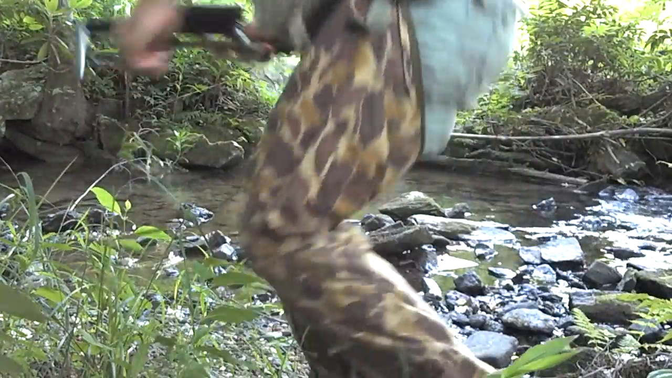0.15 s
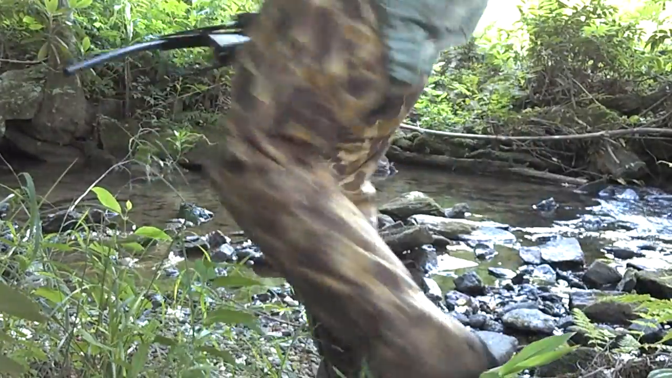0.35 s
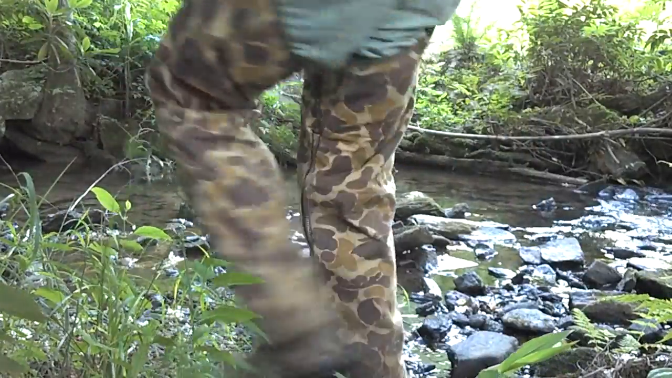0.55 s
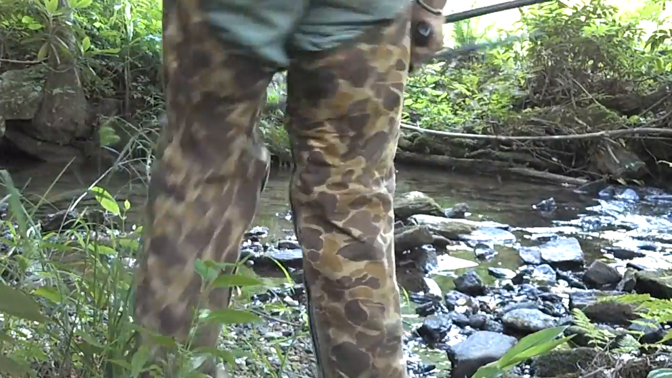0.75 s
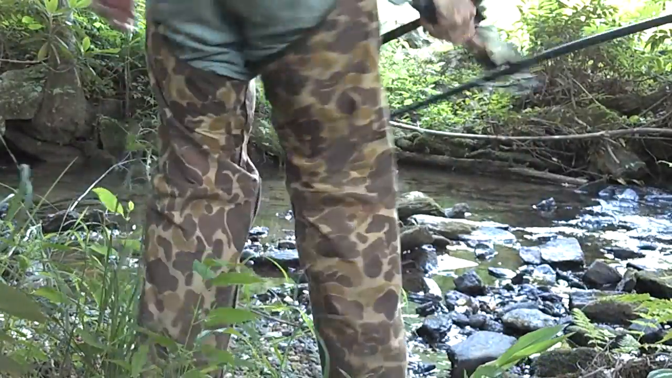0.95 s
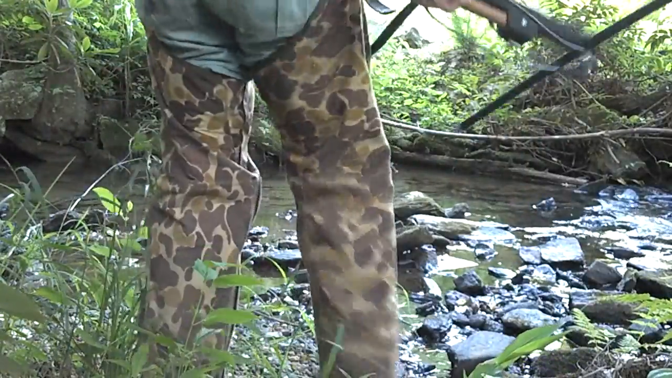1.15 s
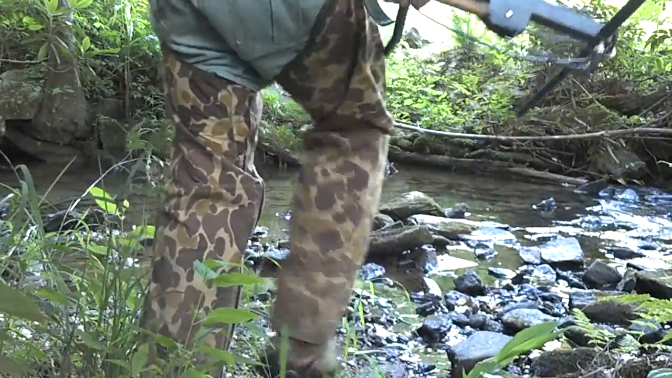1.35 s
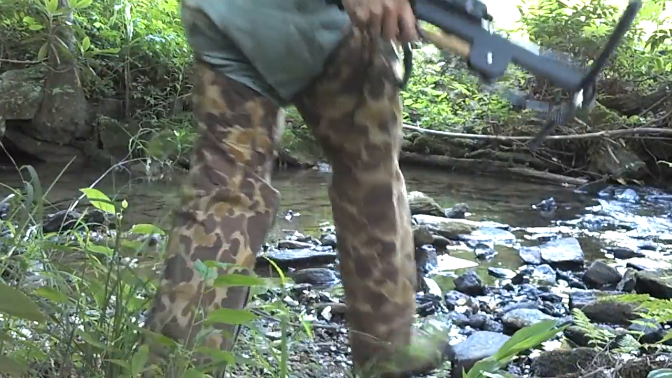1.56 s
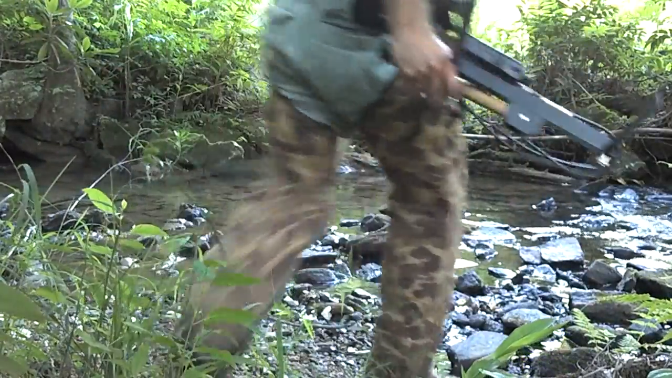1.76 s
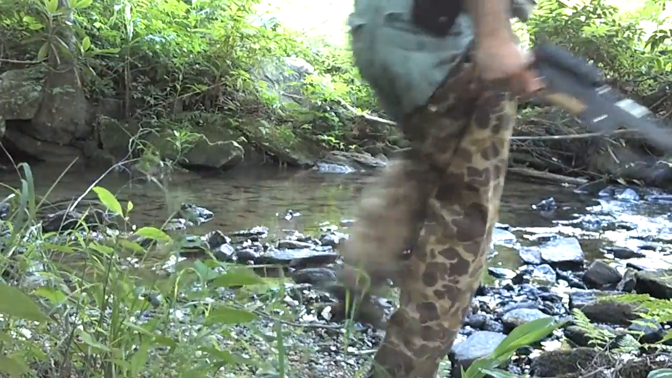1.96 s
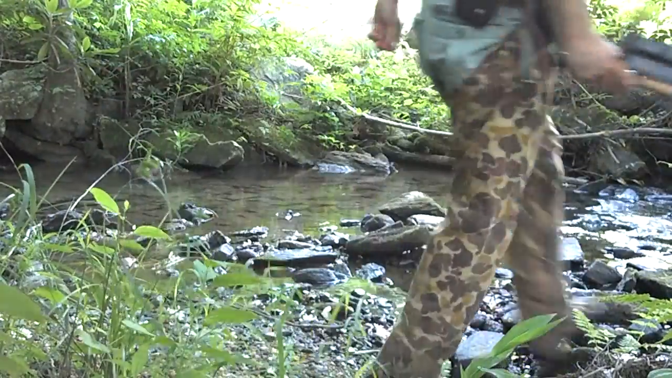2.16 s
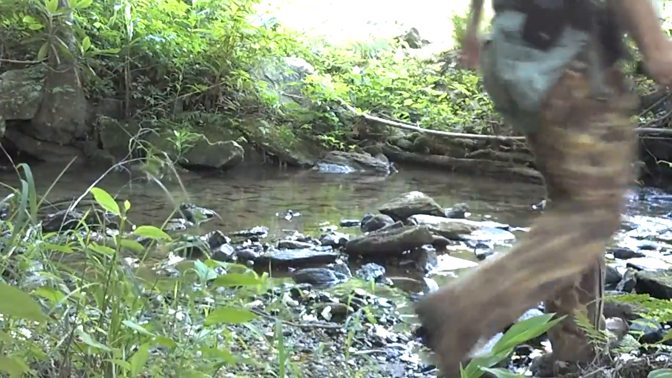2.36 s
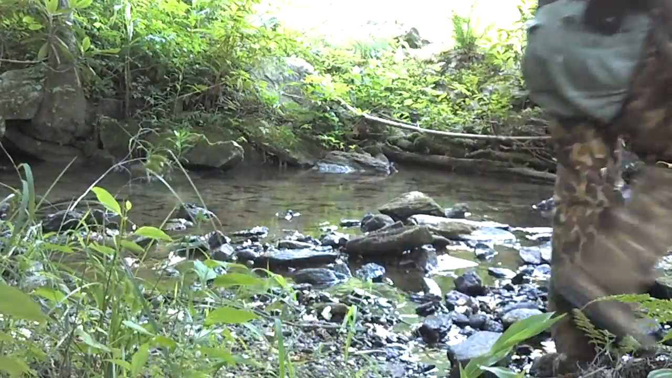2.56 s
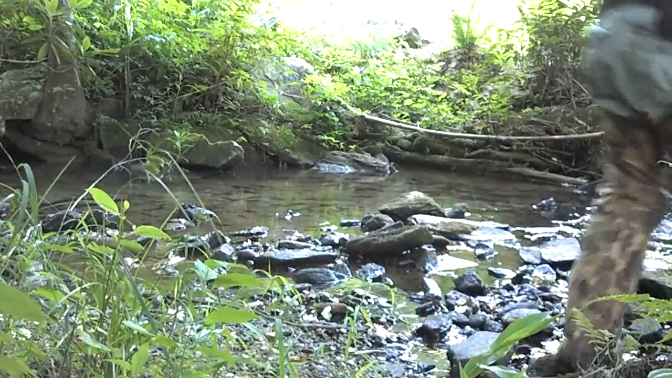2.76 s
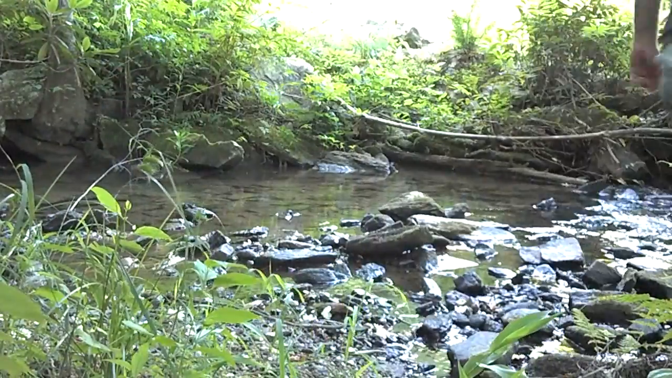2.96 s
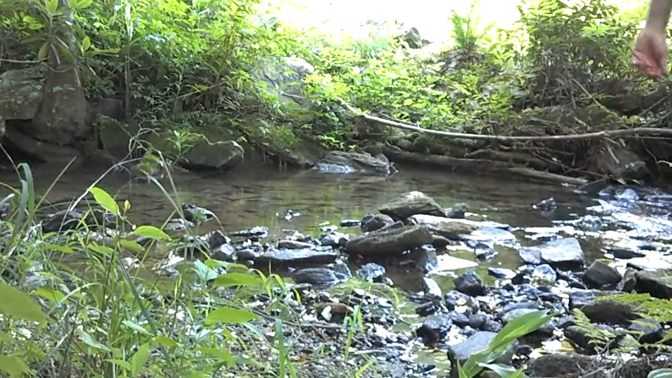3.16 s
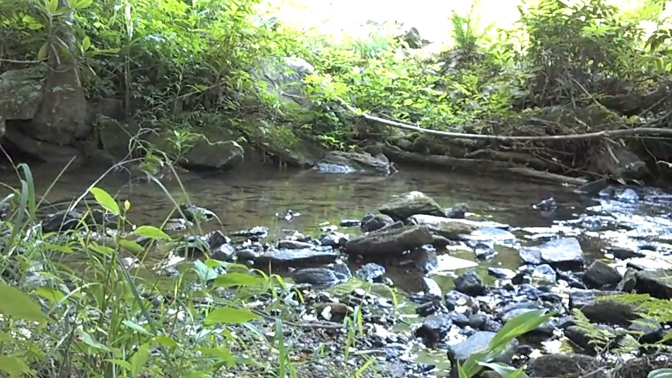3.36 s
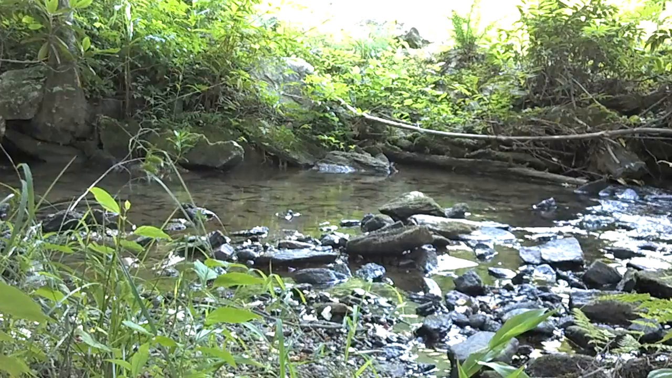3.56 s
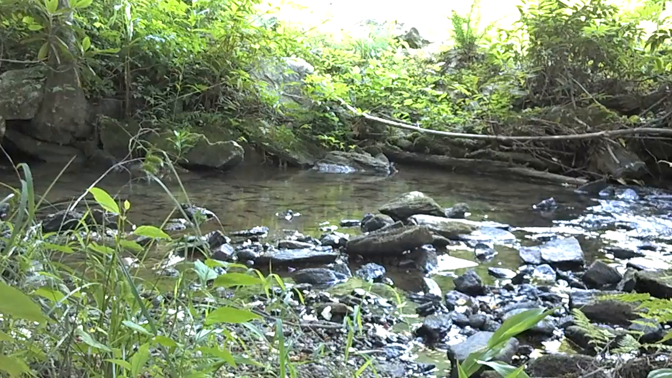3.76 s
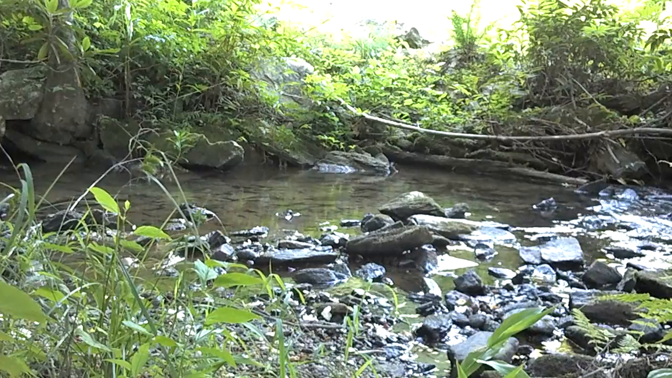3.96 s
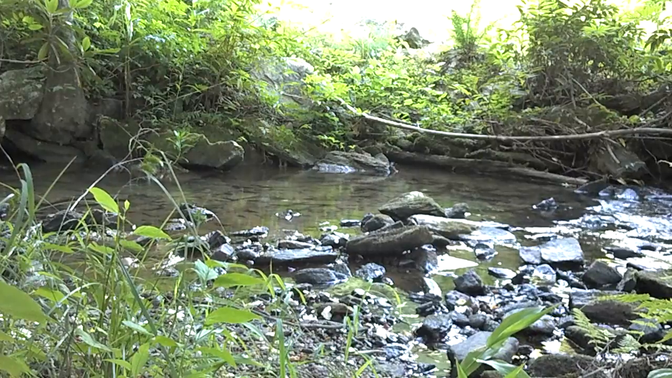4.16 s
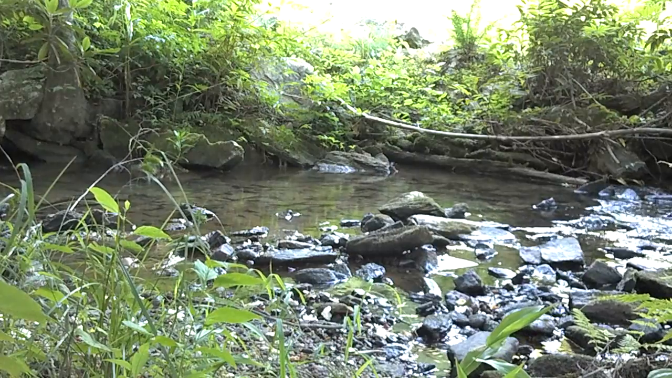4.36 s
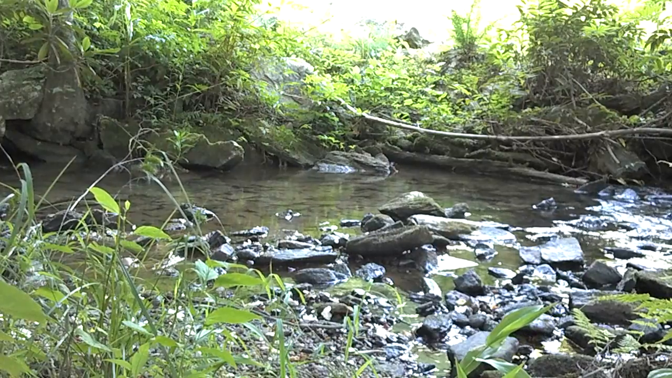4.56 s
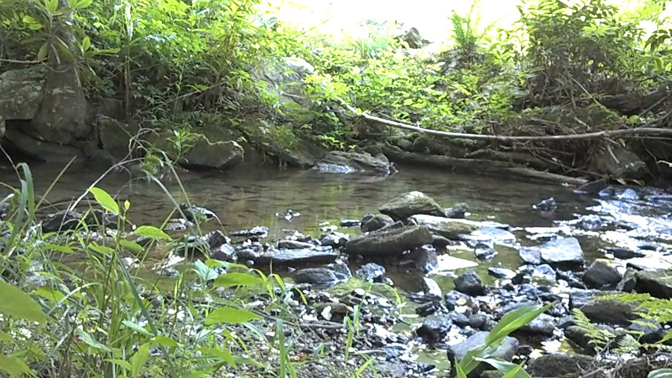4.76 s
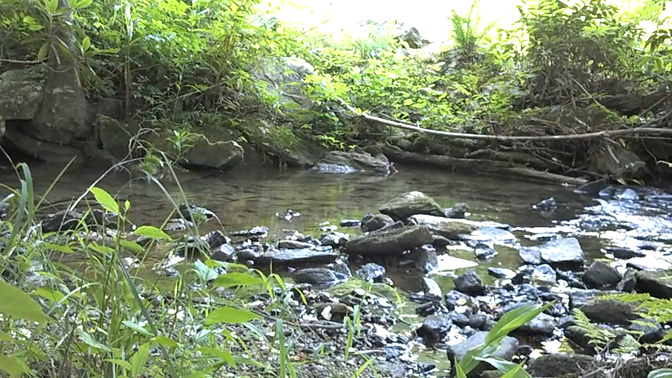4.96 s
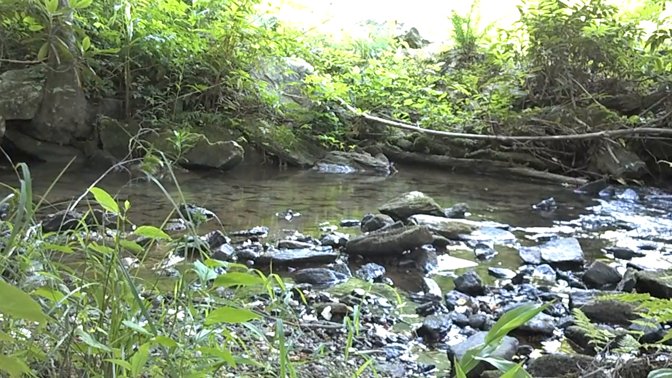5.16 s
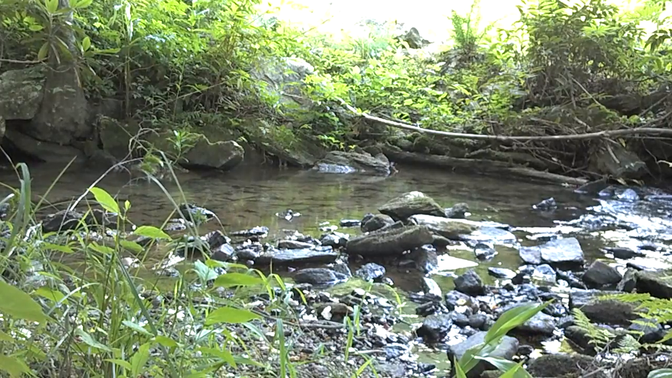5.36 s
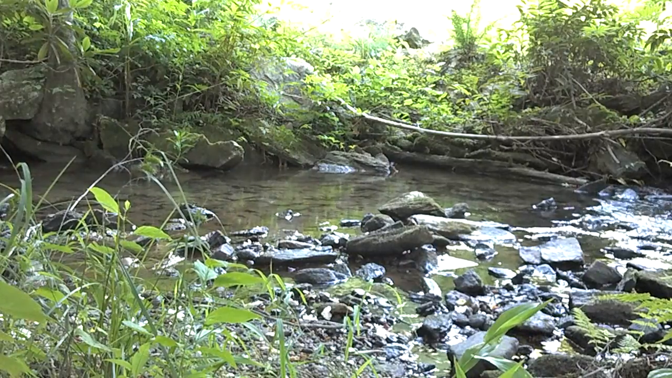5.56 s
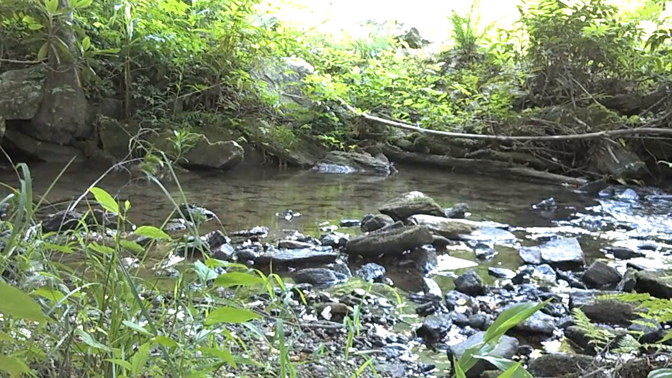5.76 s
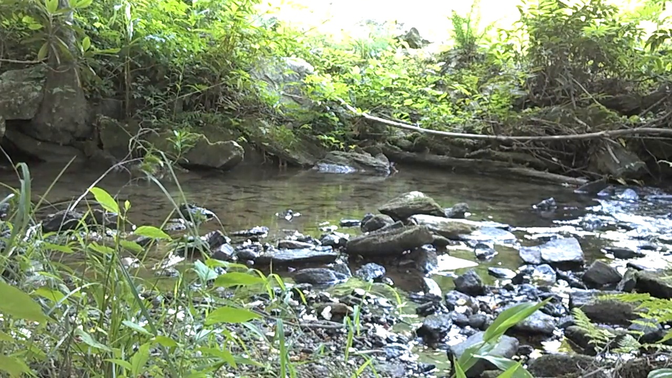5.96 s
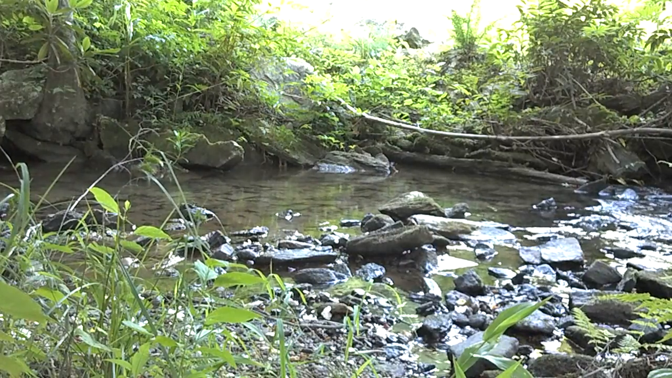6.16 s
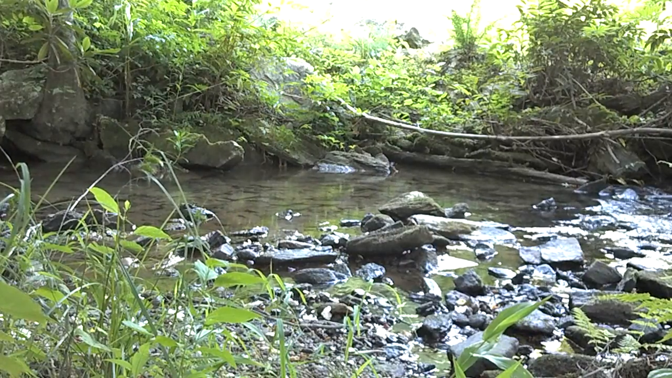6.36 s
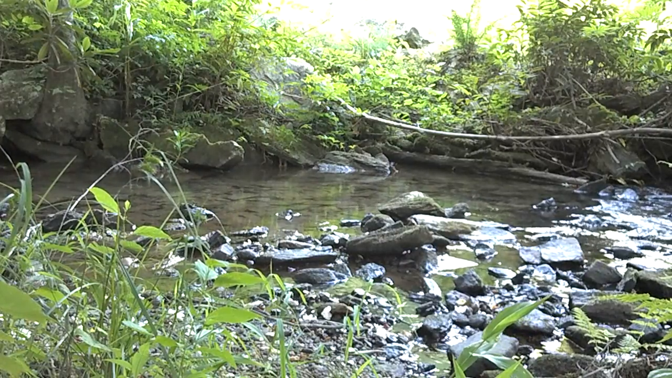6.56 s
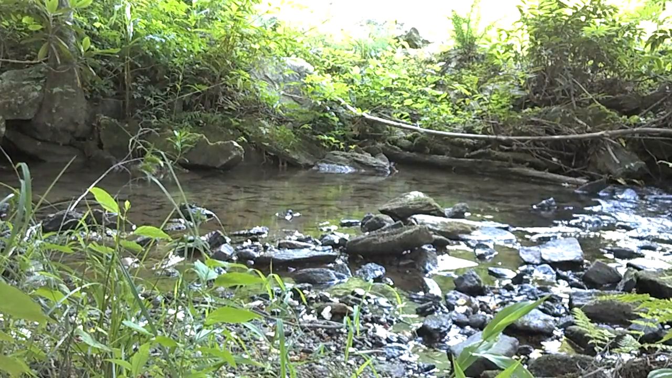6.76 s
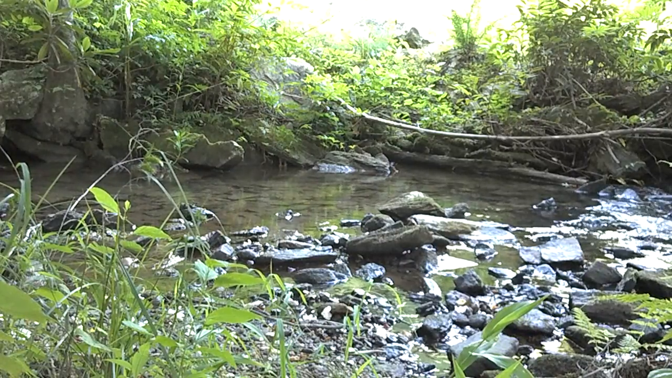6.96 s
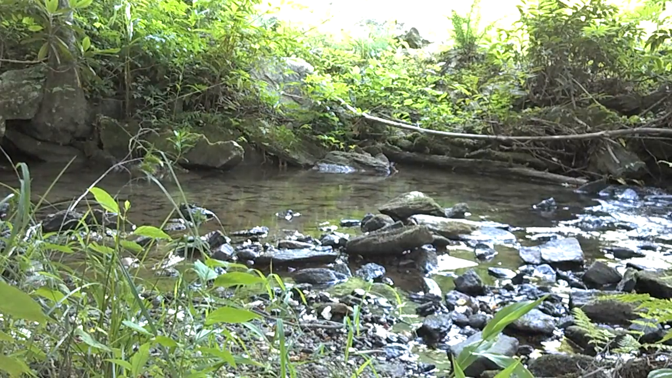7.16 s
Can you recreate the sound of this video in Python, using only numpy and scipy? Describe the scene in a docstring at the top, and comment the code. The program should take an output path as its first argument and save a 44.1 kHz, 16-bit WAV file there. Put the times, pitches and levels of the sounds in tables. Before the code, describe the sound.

A shallow rocky creek runs throughout, a steady soft rush with fine spray, low gurgling and little rising bubble plinks, over a faint lumpy breeze. Close by, someone in waders moves on the gravel bank. At 0.1 s a low sole thud and cloth rustle; around 0.7 s a gravel scrape and swish; at 1.0 s a dull step, then a crisp tick at 1.2. Shuffling grows from 1.8 s, stones knock at 2.2, and the loudest crunch comes near 2.4-2.6 s, grinding, rustling and clacking. A firm step lands at 2.95 s, softer hollow thumps at 3.4 and 3.7, brushing and a step around 4.0, small stone clicks at 4.6. A sharp, dry stone clack snaps at 5.3 s. Afterwards lighter scuffs at 5.6-5.9, 6.75 and 7.0 s punctuate the continuing water. The walker drifts across the stereo image; the sound is open and dry.

```python
"""Creek and gravel walker

A shallow creek rushes and gurgles: patchy filtered noise, and short rings of rising pitch for bubbles.
Someone in waders crosses the gravel bank: soles, gravel, cloth and leaves are grainy noise, swelling with
each event; stones knock as brief tone pulses, and short coloured noise bursts tick.
A light breeze adds lumpy low noise. Cross-subtracting two delayed ports combs the stereo image."""
import sys
import numpy as np
from scipy import signal
from scipy.fft import rfft, irfft, next_fast_len
from scipy.io import wavfile
from scipy.ndimage import uniform_filter1d

SR = 44100
rng = np.random.default_rng(int(sys.argv[2]) if len(sys.argv) > 2 else 0)


def master(y):
    """Save y as 16-bit WAV."""
    cut = np.clip(np.atleast_2d(y).T, -1, 1)
    pcm = np.round(cut * 32767)  # scale
    wavfile.write(sys.argv[1], SR, pcm.astype(np.int16))


N = 321930


def gain_of(db):
    """Amplitude ratio of a level in dB."""
    return 10 ** (np.asarray(db) / 20)


def evened(x):
    """Scales to unit rms."""
    return x / np.sqrt(np.mean(x ** 2) + 1e-20)


def read(points, hz, axis=1):
    """Reads one column of a table on a log-frequency axis."""
    table = np.transpose(points)
    return np.interp(np.log(hz + 1), np.log(table[0] + 1), table[axis])


def add(mix, start_s, sound):
    """Mixes a sound in at start_s, cut at the end."""
    part = mix[round(start_s * SR):][:len(sound)]
    part += sound[:len(part)]


# microphone ports: [f/Hz, likeness (-1 to 1), first minus second level/dB]
PORT_PAIR = [(90, 1, 1), (294, 0.96, -1.5), (635, 0.98, -2), (1100, 0.32, 5), (1800, .05, 2),
             (2700, -.15, 3), (3800, 0, 4.5), (6800, 0.02, 9), (10060, -0.12, 14.5), (11800, -0.85, -14),
             (14500, 0.29, -11)]


def port_tilt(hz):
    """Half the level difference of the ports, as a gain: first times it, second divided by it."""
    return gain_of(read(PORT_PAIR, hz, axis=2) / 2)


def hiss(tone, patchy_db):
    """Noise from many directions at both ports, with drifting patches in time and pitch."""
    frames, hz = N // 128 + 5, np.fft.rfftfreq(512, 1 / SR)
    a, b, c, d, patches = rng.standard_normal((frames, 257, 5)).T
    patches = uniform_filter1d(patches, 6, 0)
    patches = evened(uniform_filter1d(patches, 14, 1))
    same = np.clip(read(PORT_PAIR, hz), -1, 1)[:, None]
    first, other = a + 1j * b, c + 1j * d
    second = same * first + np.sqrt(1 - same ** 2) * other
    tilt = port_tilt(hz)[:, None]
    z = np.array([first * tilt, second / tilt])
    z *= gain_of(read(tone, hz)[:, None] + patchy_db * patches)
    return evened(signal.istft(z, nperseg=512, noverlap=384)[1][:, :N])


def random_hits(per_s, spread_db):
    """Sparse impulses at random times, of uneven amplitude."""
    size = gain_of(spread_db * np.minimum(rng.exponential(1, N), 4))
    return size * (rng.random(N) < per_s / SR)


def grainy(per_s, spread_db, ring_s, bed):
    """Envelope of random slips, each starting sharply and dying, over a steady bed."""
    power = random_hits(per_s, 2 * spread_db)
    power = signal.lfilter([1], [1, -np.exp(-1 / (ring_s * SR))], power)
    return evened(np.sqrt(bed + power / power.mean()))


def from_side(x, lag):
    """A point source reaches the second port lag samples after the first."""
    size = next_fast_len(N)
    hz = np.fft.rfftfreq(size, 1 / SR)
    tilt, z = port_tilt(hz), rfft(x, size)
    delay = np.exp(-2j * np.pi * hz * lag / SR)
    return irfft([z * tilt, z / tilt * delay], size)[:, :N]


def ring(hz, cycles, glide):
    """Decaying sine with a soft start; a positive glide raises the pitch."""
    turns = np.arange(2000) / SR * hz
    tone = np.sin(2 * np.pi * turns * (1 + glide * turns))
    return tone * np.exp(-turns / cycles) * (1 - np.exp(-turns / 1.87))


def blips(per_s, low_hz, high_hz, cycles, glide, spread_db, lags):
    """Random short rings of many pitches and sizes, from a few directions."""
    out, count = np.zeros((len(lags), N)), 24
    hits = random_hits(per_s, spread_db)
    kind = rng.integers(0, count, N)
    for k, hz in enumerate(np.geomspace(low_hz, high_hz, count)):
        out[k % len(lags)] += signal.oaconvolve(hits * (kind == k), ring(hz, cycles, glide))[:N]
    return evened(sum(from_side(x, lag) for x, lag in zip(out, lags)))


# steady creek rush spectrum: [f/Hz, relative level/dB per Hz]
RUSH_TONE = [(30, -18), (55, -33), (90, -28), (130, 9), (250, -9.5), (500, 5), (800, -3.5), (1200, -7.5),
             (1900, -21), (2400, -58), (3200, -10), (4000, -10.5), (5000, -12.5), (6200, -16),
             (8000, -17.5), (10000, -26), (12000, -37), (14500, -22)]


def creek():
    """A patchy rush with fine spray in it, and bubbles that ring with rising pitch."""
    rush = hiss(RUSH_TONE, patchy_db=1.0) * grainy(per_s=150, spread_db=3.0, ring_s=0.0079, bed=0.39)
    gurgle = blips(per_s=320, low_hz=335.3, high_hz=1897, cycles=4.3, glide=0.0068,
                   spread_db=3.5, lags=(-3.5, 1.5, 6.5))
    # one pocket between the stones keeps releasing bubbles of a like size
    pocket = blips(per_s=30, low_hz=490, high_hz=620.5, cycles=6.6, glide=0.002,
                   spread_db=2.0, lags=(1.5,))
    return gain_of(-56) * rush + gain_of(-64.5) * pocket + gain_of(-58.5) * gurgle


# breeze spectrum at the ports: [f/Hz, relative level/dB per Hz]
BREEZE_SPECTRUM = [(30, 11), (60, -4), (130, 5), (300, -3.5), (700, -7), (1500, -60)]


def breeze():
    """Lumpy low noise, unrelated at the two ports."""
    hz = np.fft.rfftfreq(N, 1 / SR)
    noise = irfft(rfft(rng.standard_normal((2, N))) * gain_of(read(BREEZE_SPECTRUM, hz)), N)
    lumps = evened(irfft(rfft(rng.standard_normal((2, N))) * np.exp(-hz / 5.2), N))
    return gain_of(-56.5) * evened(noise) * gain_of(4.8 * lumps)


# walker's bearing, crossing in front of the ports: [t/s, second-port lag/samples]
WALKER_BEARING = [(0, 6), (1.1, 5), (2.2, 4.5), (3.0, -0.5), (3.7, -2), (4.6, -5.5), (5.3, -5), (5.6, -4),
                  (7.0, -6.5)]


def from_walker(x):
    """A sound whose lag at the second port follows the walker's bearing."""
    n, (s, lag) = np.arange(N), np.transpose(WALKER_BEARING)
    first, second = from_side(x, lag=0)
    return np.array([first, np.interp(n - np.interp(n / SR, s, lag), n, second)])


# walker's nearness, scaling the shuffle between events: [t/s, level/dB]
WALKER_NEARNESS = [(0, 3.5), (1.2, -0.5), (2.2, 4.5), (2.8, -1), (3.6, -2.5), (4.8, 1.5), (6.002, 0),
                   (7.3, 0)]
SHUFFLE_DB, SHUFFLE_HZ = 1, 28  # waver depth (rms) and rate scale


def effort(events, axis, bed_db):
    """A wavering shuffle that follows nearness, plus one rise and fall for each event."""
    t, (s, near_db) = np.arange(0, N, 64) / SR, np.transpose(WALKER_NEARNESS)
    waver_hz = np.fft.rfftfreq(len(t), t[1])
    waver = irfft(rfft(rng.standard_normal(len(t))) * np.exp(-waver_hz / SHUFFLE_HZ), len(t))
    power = gain_of(2 * (bed_db + np.interp(t, s, near_db) + SHUFFLE_DB * evened(waver)))
    for row in events:
        peak_s, rise_s, fall_s = row[:3]
        away = np.where(t < peak_s, (peak_s - t) / rise_s, (t - peak_s) / fall_s)
        power = power + gain_of(2 * (row[axis] - 20 * away))
    return np.interp(np.arange(N) / SR, t, np.sqrt(power))


# soles rolling on the bank: [f/Hz, relative level/dB]
SOLE_SPECTRUM = [(70, -55), (130, -9), (200, 6.5), (350, 3), (550, -2.5), (900, -14.5), (2000, -54)]


def tread():
    """Low grainy noise, near enough that both ports hear it alike."""
    soles = from_walker(hiss(SOLE_SPECTRUM, patchy_db=3.3)[0])
    return soles * grainy(per_s=130, spread_db=3.0, ring_s=0.0062, bed=0.41)


# gravel grinding under the soles: [f/Hz, relative level/dB]
GRAVEL_SPECTRUM = [(300, 5), (600, 3), (900, 13), (1300, -4.5), (2000, 0.5), (3000, -24), (6000, -20)]


def grind():
    """Grainy scraping, with short rings as small stones nudge each other under the load."""
    scrape = hiss(GRAVEL_SPECTRUM, patchy_db=0.7) * grainy(per_s=200, spread_db=5.0, ring_s=0.009, bed=0.56)
    nudges = blips(per_s=500, low_hz=533, high_hz=2320, cycles=2.27, glide=0,
                   spread_db=-1.0, lags=(-2.5, 5.5))
    return gain_of(-8.0) * scrape + gain_of(-9.0) * nudges


# soles loading the bank: [peak t/s, 20 dB rise/s, 20 dB fall/s, tread gain/dB, grind gain/dB]
SOLE_LOADS = [(0.1, 0.029, 0.11, -37.5, -61), (0.67, 0.7, 0.17, -43, -50), (1.025, 0.03, 0.18, -41.5, -56),
              (1.14, 0.15, 0.089, -65, -44.5), (1.35, 0.18, 0.26, -43.5, -44), (1.66, 0.13, 0.1, -49, -64),
              (1.84, 0.076, .1, -48, -44), (1.93, 0.18, 0.21, -40, -34.5),
              (2.19, 0.077, 0.14, -38.5, -40.5), (2.32, .1, 0.069, -60, -45), (2.44, 0.031, .06, -42, -32),
              (2.48, 0.063, 0.11, -34, -30.5), (2.61, 0.26, 0.14, -38, -58), (2.9, 0.11, .05, -42.5, -53),
              (2.965, 0.064, 0.17, -33.5, -45), (3.42, 0.083, 0.29, -42, -46), (3.7, 0.13, 0.19, -53, -67),
              (3.96, 0.056, 0.18, -57, -47), (4.03, 0.26, 0.11, -42.5, -53), (4.1, 0.035, 0.06, -42, -50),
              (4.22, 0.055, .06, -60, -53), (4.578, 0.035, 0.057, -39, -52),
              (4.615, 0.039, 0.041, -55, -40), (4.72, 0.1, 0.3, -72, -45),
              (5.29, 0.11, 0.083, -37.5, -40.5), (5.44, 0.047, .06, -60, -49),
              (5.62, 0.091, 0.058, -45, -48), (5.77, 0.076, 0.21, -56, -46.5),
              (5.9, 0.066, 0.016, -45.5, -50), (6.18, 0.089, 0.029, -51, -46.5),
              (6.64, 0.4, 0.18, -59, -46), (6.8, 0.32, 0.24, -52.5, -49.5), (7.04, 0.2, 0.22, -46, -71)]


def footfalls():
    """Tread and grind swell as each sole loads the bank."""
    return (effort(SOLE_LOADS, axis=3, bed_db=-60.5) * tread()
            + effort(SOLE_LOADS, axis=4, bed_db=-54.5) * grind())


# waders and leaves brushing: [f/Hz, relative level/dB]
RUSTLE_SPECTRUM = [(1000, 16), (2200, 11), (3200, 6.5), (4000, 7.5), (5000, 6.5), (6200, 5.5), (8000, 4),
                   (10500, -11.5), (13000, -2.5), (16000, -34)]


def rustle():
    """Grainy noise of waders and leaves; dry leaves and grit crackle as short rings."""
    brushing = hiss(RUSTLE_SPECTRUM, patchy_db=2.88) * grainy(per_s=150, spread_db=1.0, ring_s=0.004, bed=1.0)
    crackle = blips(per_s=250, low_hz=2300, high_hz=7740, cycles=7.8, glide=0,
                    spread_db=1.0, lags=(-3.5, 5.5, 9.5))
    return brushing + gain_of(-10.5) * crackle


# thin high swish of the cloth: [f/Hz, relative level/dB]
SWISH_SPECTRUM = [(6000, -8.5), (9500, -5.5), (12000, -6), (14500, -1.5), (16000, -2.5)]


def swish():
    """High cloth noise in sparse, slower grains."""
    return hiss(SWISH_SPECTRUM, patchy_db=2.6) * grainy(per_s=54, spread_db=4.0, ring_s=0.017, bed=0.99)


# cloth and leaves brushed: [peak t/s, 20 dB rise/s, 20 dB fall/s, rustle gain/dB, swish gain/dB]
BRUSH_EVENTS = [(0.02, 0.11, 0.04, -53, -52), (0.45, 0.028, .04, -65, -54), (0.67, 0.057, 0.1, -50.5, -46),
                (0.91, 0.56, 0.071, -59, -53), (1.06, 0.31, 0.3, -53, -54.5),
                (1.22, 0.032, 0.016, -49.5, -54), (1.38, 0.54, 0.32, -53, -51.5),
                (1.83, 0.099, 0.1, -45.5, -52), (1.93, 0.094, 0.18, -43, -50),
                (2.09, .06, 0.067, -60, -44.5), (2.21, 0.12, 0.12, -52.5, -61),
                (2.45, 0.065, 0.33, -40.5, -52), (2.54, 0.18, 0.049, -42, -67), (2.68, 0.17, .15, -74, -67),
                (2.95, 0.065, 0.28, -46.5, -48), (3.31, 0.014, 0.063, -47.5, -53),
                (3.49, 0.18, 0.082, -50.5, -55.5), (3.7, 0.069, 0.071, -53, -50),
                (3.96, 0.052, 0.11, -44.5, -47), (4.15, 0.098, 0.013, -49, -57),
                (4.25, 0.12, 0.2, -55.5, -56), (4.63, 0.07, 0.16, -48, -66), (5.02, .04, 0.055, -65, -59),
                (5.31, 0.058, 0.067, -42.5, -72), (5.65, .12, 0.38, -58, -61), (5.81, .06, 0.045, -58, -59),
                (6.53, 0.088, 0.025, -63, -57), (6.77, 0.052, 0.086, -50, -65),
                (7.04, .04, 0.074, -76, -67)]


def brushes():
    """Rustle and swish swell as cloth and leaves are brushed in passing."""
    return (effort(BRUSH_EVENTS, axis=3, bed_db=-57) * rustle()
            + effort(BRUSH_EVENTS, axis=4, bed_db=-61.5) * swish())


# short noise bursts, ticks and one longer burst near 2.7 kHz: [t/s, level/dB, centre f/Hz, t60/s]
TICK_BURSTS = [(0.0148, -32.5, 7030, 0.046), (0.106, -41, 4760, 0.022), (0.394, -37.5, 3740, .022),
               (1.2027, -34, 6000, .008), (1.2144, -22, 9800, 0.0047), (1.2212, -30, 14500, .012),
               (1.7424, -43, 4080, .02), (2.1683, -30, 6800, .016), (2.176, -31.5, 3740, 0.017),
               (2.249, -39.5, 4140, .03), (2.3126, -36, 6500, 0.031), (2.4229, -31, 7150, 0.022),
               (2.4234, -34, 12500, .01), (2.4456, -30, 6800, 0.012), (2.447, -36, 4200, .015),
               (2.4654, -30, 4290, .018), (2.479, -32, 6800, .015), (2.495, -42, 7000, 0.012),
               (2.5426, -23, 4500, 0.019), (2.9397, -46, 4070, 0.024), (2.952, -36, 4200, 0.032),
               (3.2725, -45, 4310, .02), (3.3147, -33, 3900, 0.014), (3.4775, -35, 7000, .02),
               (3.614, -37.5, 4680, 0.022), (3.7, -36, 7110, .02), (3.9448, -29.5, 6500, 0.037),
               (4.032, -34, 4560, .018), (4.127, -33.5, 2650, 0.07), (4.1425, -35, 6500, .01),
               (4.2507, -37, 3880, 0.025), (4.602, -39, 3800, .01), (4.631, -34.5, 4000, 0.029),
               (4.665, -41, 6500, .012), (4.7145, -43, 4500, .012), (4.8404, -38, 4100, .02),
               (5.069, -38, 7100, 0.027), (5.295, -19.5, 2980, 0.0095), (5.2972, -38, 7040, 0.022),
               (5.2965, -44, 11500, 0.0066), (5.305, -38, 4540, .03), (5.312, -35, 3930, .03),
               (5.2959, -32.5, 3830, 0.058), (5.47, -45, 3780, .015), (5.7992, -39, 10500, 0.0054),
               (5.8004, -32, 14500, 0.011), (5.8065, -37, 14500, .01), (6.321, -46, 3820, .02),
               (6.3544, -40, 7570, .018), (6.616, -40, 4180, .02), (6.5246, -46, 7350, .018),
               (6.756, -36.5, 4260, 0.029), (7.028, -41, 7300, .012), (7.034, -41, 13500, .02),
               (7.041, -44, 14500, 0.04)]
TICK_OCTAVES, TICK_LAG_SAMPLES = 0.31, 3.35
TICK_T60_S, TICK_NARROWING = 0.022, 0.17  # longer bursts are narrower in colour


def ticks():
    """Short noise bursts, each with a colour around its centre."""
    out, t = np.zeros((2, N)), np.arange(2048) / SR
    hz = np.fft.rfftfreq(2048, 1 / SR)
    tilt = port_tilt(hz)
    delay = np.exp(-2j * np.pi * hz * TICK_LAG_SAMPLES / SR)
    lead = 32  # samples of room before the onset
    for (s, db, centre_hz, t60), noise in zip(TICK_BURSTS, rng.standard_normal((len(TICK_BURSTS), 2048))):
        width = TICK_OCTAVES * (TICK_T60_S / t60) ** TICK_NARROWING
        burst = irfft(rfft(noise) * np.exp(-(np.log2((hz + 1) / centre_hz) / width) ** 2))
        burst = burst / abs(burst[:200]).max()
        envelope = gain_of(db - 60 * t / t60) * (1 - np.exp(-t / 0.00029))
        z = rfft(np.roll(envelope * burst, lead))
        add(out[0], s - lead / SR, irfft(z * tilt))
        add(out[1], s - lead / SR, irfft(z / tilt * delay))
    return out


# soles landing, stones rocking, knocking, once squeaking: [middle t/s, level/dB, f/Hz, length/cycles]
BLOWS = [(0.0945, -33, 806, 0.76), (0.0975, -39, 710, 5.1), (0.1296, -34.5, 1140, 1.3),
         (0.621, -40, 211, 0.45), (0.6368, -37, 744, 1.2), (0.6622, -32, 470, 3.4), (0.6795, -33, 486, 4.3),
         (0.833, -39, 895, 1), (0.9925, -37, 444, 1), (1.0195, -38, 794, 0.55), (1.0215, -24.5, 240, 1.15),
         (1.378, -30, 386, 1.5), (1.4339, -31, 360, 1.04), (1.66, -40, 576, 2.2), (1.682, -33, 111, 0.66),
         (1.7644, -37, 790, 1), (1.784, -33.5, 600, 0.72), (1.789, -36, 131, 1.2), (1.8418, -30, 318, 0.66),
         (1.9411, -25, 605, 0.72), (1.953, -33, 910, 0.59), (2.035, -33, 206, 0.81),
         (2.169, -28.5, 1160, 0.79), (2.178, -31.5, 795, 2), (2.1995, -26, 477, 1), (2.2052, -22, 427, 2.4),
         (2.2172, -23.5, 330, 0.64), (2.2497, -30.5, 1550, 1.1), (2.313, -23, 1030, 1.1),
         (2.3152, -28, 1210, 1.1), (2.4224, -20.5, 157, 0.45), (2.4239, -19.5, 960, 0.77),
         (2.4395, -33, 813, 14), (2.4445, -34, 960, 2.8), (2.447, -31.5, 1480, 3.1),
         (2.4697, -26, 940, 6.4), (2.48, -25, 1180, 1.4), (2.4876, -33, 746, 3.5), (2.4962, -33, 1410, .9),
         (2.502, -30, 1160, 0.91), (2.5432, -29, 1300, 1.9), (2.5604, -23.5, 400, 1.3),
         (2.5804, -24.5, 172, 0.57), (2.6074, -36, 335, 4.1), (2.9405, -33, 541, 0.75),
         (2.9712, -33.5, 484, 6.4), (2.9807, -22, 550, 0.79), (3.4154, -23.5, 238, 0.67),
         (3.6857, -23.5, 247, 0.5), (3.692, -22.5, 340, 0.71), (3.694, -21.5, 173, 1.4),
         (3.6993, -33, 337, 2.5), (3.95, -26, 198, 0.95), (3.956, -29.5, 294, 1.3), (3.985, -41, 920, 1.3),
         (4.022, -39, 447, 1.2), (4.0865, -28, 437, 0.86), (4.096, -33.5, 200, 1), (4.13, -46.5, 1050, 6.7),
         (4.564, -35, 168, 0.88), (4.5853, -27, 193, 0.47), (4.6026, -30, 1530, 0.77),
         (4.607, -27.5, 1690, 0.74), (4.6114, -30, 1030, 1.1), (4.615, -32, 1350, 2.2),
         (4.6305, -39, 1000, 0.87), (4.68, -44, 795, 9), (4.697, -42, 740, 6.7), (4.706, -40, 2000, 3),
         (4.7156, -29, 1220, 2), (4.8436, -39, 1470, 6.2), (5.2096, -41, 604, 1), (5.238, -32, 266, 1.6),
         (5.2601, -32.5, 1289, 1.1), (5.2858, -36, 358, 10.5), (5.2928, -35, 660, 0.69),
         (5.2968, -15, 1640, 0.84), (5.2983, -30, 1460, 0.86), (5.2999, -35, 690, 4.4),
         (5.5947, -30, 406, 2.5), (5.621, -41, 335, 6.7), (5.63, -27.5, 300, 1.26), (5.894, -38, 150, 1.9),
         (6.506, -42, 710, 0.79), (6.729, -35, 1100, 1.6), (6.7382, -34, 1030, 2), (7.0105, -39, 700, 0.92),
         (7.021, -39, 378, 4.5), (7.0352, -28, 370, 2.7), (7.046, -41, 14700, 150)]
RATTLE_DB, RATTLE_CYCLES = -23, 3.2  # faint ring after the blow's middle
KNOCK_ATTACK = 0.66  # swell length / decay length


def knocks():
    """Wet stones barely ring: most blows swell and die within a few cycles."""
    out = np.zeros(N)
    t = (np.arange(2000) - 1000) / SR
    for s, db, hz, cycles in BLOWS:
        swell = np.exp(-2 * (t * hz / cycles / np.where(t < 0, KNOCK_ATTACK, 1)) ** 2)
        blow = swell * np.sin(2 * np.pi * hz * t)
        decay = (t > 0) * np.exp(-abs(t) * hz / RATTLE_CYCLES)
        rattle = gain_of(RATTLE_DB) * decay * np.sin(2 * np.pi * 1.316 * hz * t)
        add(out, s + t[0], gain_of(db) * (blow + rattle))
    # small stones radiate little deep bass
    bass_cut = signal.butter(2, 95., "high", fs=SR, output="sos")
    return from_walker(signal.sosfilt(bass_cut, out))


# clearest bubbles: [t/s, level/dB, start f/Hz, decay/cycles]
CLEAR_BUBBLES = [(0.246, -34, 920, 2.7), (0.94, -37.5, 780, 5.7), (1.016, -23, 423, 2.2),
                 (1.764, -40, 960, 2.1), (2.033, -36, 788, 4.2), (2.064, -33, 800, 3.8),
                 (2.145, -28.5, 615, 2.2), (2.36, -30, 770, 2.5), (3.298, -39.5, 980, 5.9),
                 (3.61, -38, 560, 5), (3.631, -40, 560, 7), (3.658, -42, 600, 6.6), (3.759, -41.5, 530, 6),
                 (4.206, -44, 554, 8), (4.268, -38, 1160, 3.4), (4.456, -33, 587, 3),
                 (4.664, -36, 830, 3.8), (5.092, -37.5, 530, 3.9), (5.419, -38, 994, 5.2),
                 (5.728, -45, 530, 11), (5.769, -37, 532, 4.2), (5.83, -39, 1940, 5.6),
                 (5.889, -36, 570, 2.2), (6.027, -34.5, 1100, 3.1), (6.162, -38, 456, 3.8),
                 (6.291, -39, 670, 3.7), (6.365, -38, 1050, 4.1), (6.407, -39.5, 1920, 5),
                 (6.524, -32.5, 910, 2.5), (6.625, -43, 1120, 4.4), (6.651, -35, 980, 4.7),
                 (6.775, -34, 900, 4.5), (6.805, -37, 533, 7), (6.885, -40, 1050, 3.7),
                 (6.997, -45, 945, 5.9), (7.099, -44, 697, 5.9)]


def plinks():
    """Single bubbles of rising pitch that stand out of the gurgle."""
    out = np.zeros(N)
    for s, db, hz, cycles in CLEAR_BUBBLES:
        add(out, s, gain_of(db) * ring(hz, cycles, glide=0.0083))
    return from_side(out, lag=0.79)


def scene():
    """Sums all sources at the two ports."""
    return creek() + breeze() + footfalls() + brushes() + ticks() + knocks() + plinks()


CROSS_DELAY_SAMPLES, BASS_CUT_HZ, EDGE_HZ = 16, 75., 15770


def record(dry):
    """Each channel is one port minus the delayed other port; a bass cut, then the band limit."""
    late = np.pad(dry[::-1], ((0, 0), (CROSS_DELAY_SAMPLES, 0)))[:, :N]
    bass_cut = signal.butter(3, BASS_CUT_HZ, "high", fs=SR, output="sos")
    cut = signal.sosfilt(bass_cut, dry - late)
    band_limit = signal.firwin(1501, EDGE_HZ, window=("kaiser", 7), fs=SR)
    return signal.oaconvolve(cut, band_limit[None], "same")


dry = scene()
out = record(dry)
master(out)
```